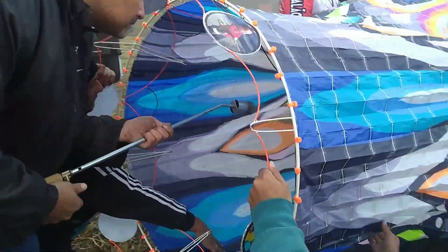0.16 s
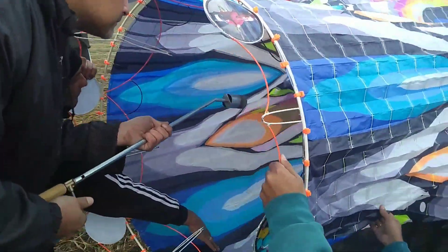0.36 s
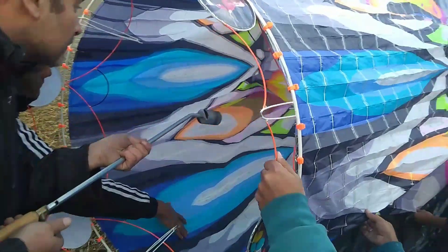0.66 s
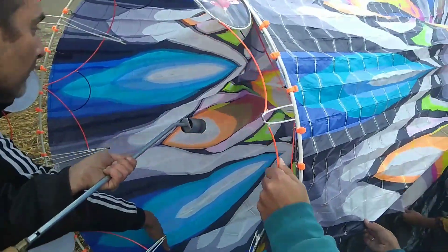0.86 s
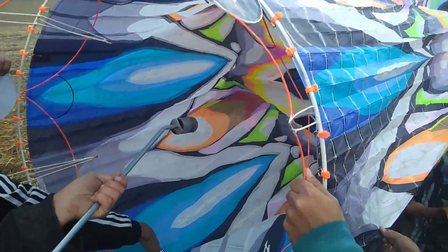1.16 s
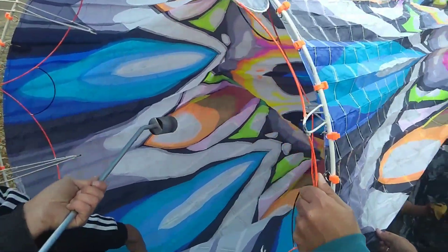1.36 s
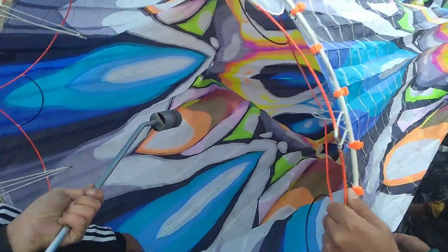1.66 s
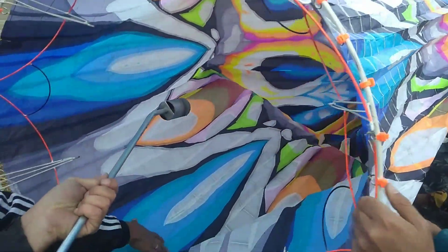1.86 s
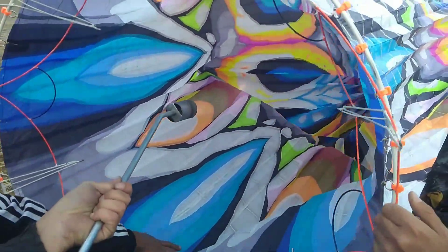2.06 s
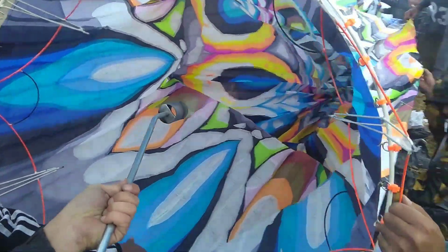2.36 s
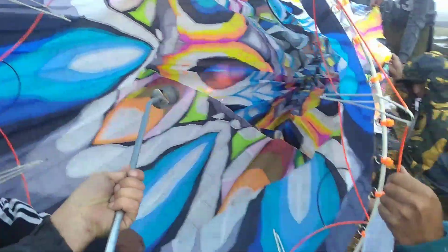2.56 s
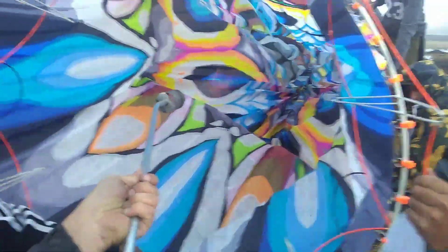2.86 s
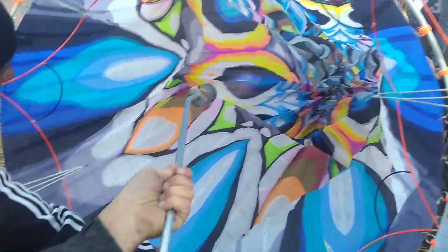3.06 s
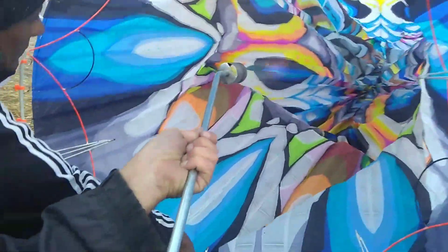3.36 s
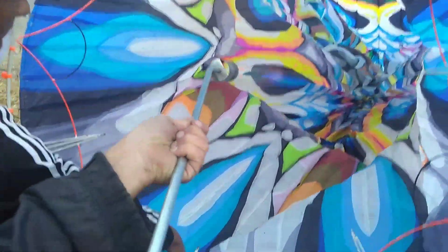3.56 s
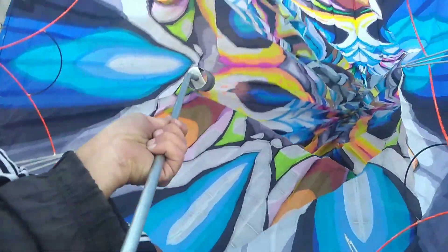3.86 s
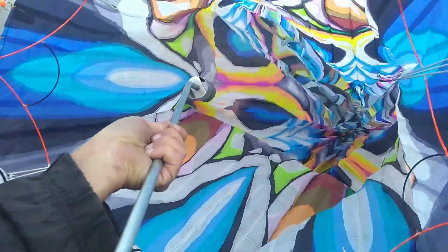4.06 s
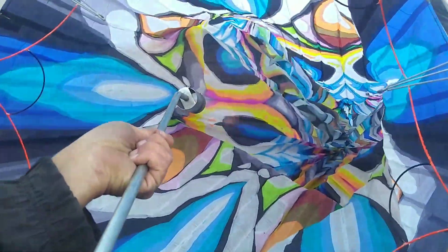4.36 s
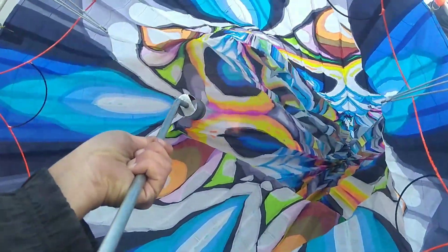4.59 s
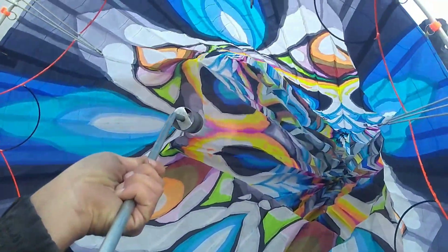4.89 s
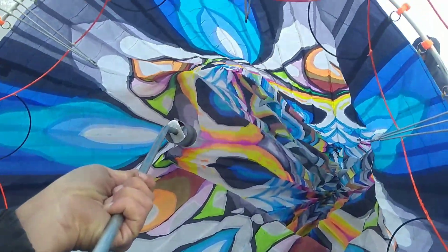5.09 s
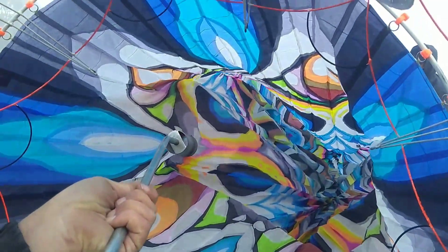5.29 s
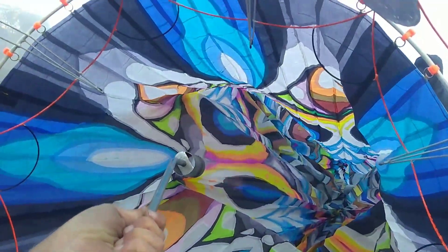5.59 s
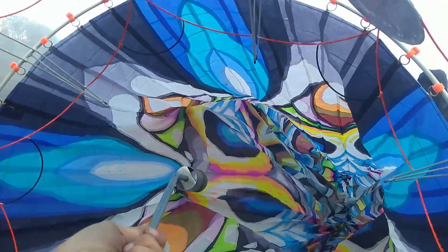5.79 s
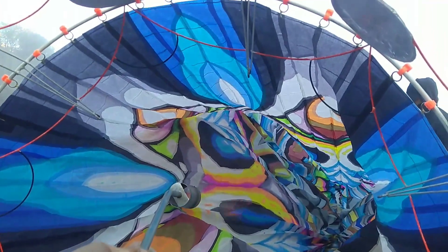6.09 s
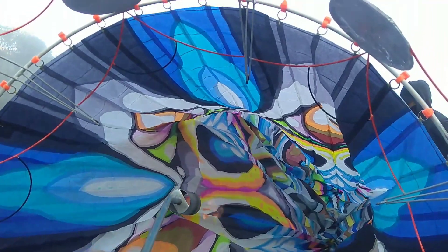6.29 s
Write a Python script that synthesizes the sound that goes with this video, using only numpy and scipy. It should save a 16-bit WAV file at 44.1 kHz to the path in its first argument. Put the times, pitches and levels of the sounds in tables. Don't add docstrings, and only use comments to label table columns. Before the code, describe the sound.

A hand-held gas torch burns steadily close by outdoors, a low fluttering flame roar under a constant hissing gas jet, fading quickly at the end.

```python
import sys
import numpy as np
from scipy import signal
from scipy.fft import rfft, irfft, next_fast_len
from scipy.io import wavfile
from scipy.ndimage import uniform_filter1d, map_coordinates

SR = 44100
rng = np.random.default_rng(int(sys.argv[2]) if len(sys.argv) > 2 else 0)


def gain_from_db(level_db):
    decades = np.asarray(level_db, float) / 20
    return 10 ** decades


def wrap_up_sound(samples):
    columns = np.atleast_2d(samples).T
    tamed = np.clip(columns, -1, 1)
    steps = np.round(tamed * 32767).astype(np.int16)
    wavfile.write(sys.argv[1], SR, steps)


N = 284004

# (time [s], aim down the balloon [0-1], bearing towards the left [dB])
TORCH = [
    (0, 0.56, 5.5),
    (.8, 0.15, 2),
    (1.2, 0.38, 1),
    (1.7, 0.14, 1.5),
    (2.8, 0.35, 0.5),
    (3.3, 0.56, 2),
    (3.9, 0.8, 2),
    (4.7, 0.92, 2),
    (5.5, 0.63, 1.5),
    (6.1, 0.9, 2.5),
]


def unit(x):
    return x / np.sqrt(np.mean(x ** 2) + 1e-20)


def along(points, hz):
    f, v = np.transpose(points)
    return np.interp(np.log(hz + 1), np.log(f + 1), v)


def curves(rows):
    s, *cols = np.transpose(rows)
    return [np.interp(np.arange(N) / SR, s, c) for c in cols]


def wobble(rate):
    knots = rng.standard_normal(int(N * rate / SR) + 4)
    return map_coordinates(knots, [np.arange(N) * rate / SR])


def filtered(x, response):
    m = next_fast_len(N + SR // 2)
    return irfft(rfft(x, m) * response(np.fft.rfftfreq(m, 1 / SR)), m)[..., :N]


def patches(hz, s, hz_wide, s_long):
    field = rng.standard_normal((len(hz), len(s)))
    field = uniform_filter1d(field, size=max(1, round(hz_wide / hz[1])), axis=0)
    return unit(uniform_filter1d(field, size=round(s_long / s[1]), axis=1))


def turbulence(patchy_db, drift_db, shape):
    hz, s, z = signal.stft(rng.standard_normal((2, N)), SR, nperseg=2048)
    quick = patchy_db * patches(hz, s, hz_wide=500, s_long=.07)
    slow = drift_db * patches(hz, s, hz_wide=200, s_long=.7)
    gain = gain_from_db(quick + slow) * shape(hz[:, None], s)
    return unit(signal.istft(z * gain, SR, nperseg=2048)[1][:, :N])


def aim(s):
    return np.clip(np.interp(s, *np.transpose(TORCH)[:2]), 0, 1)


def lean(db):
    return gain_from_db(np.array([db / 2, -db / 2]))


def echoed(hz, s):
    # (time [s], ground [ms], near wall [ms], hoop side [ms], far wall [ms])
    echo_paths = [(0.0, 3.521, 0.942, 2.412, 5.608), (0.52, 3.494, 1.162, 2.268, 5.48),
                  (1.05, 3.029, 1.011, 2.441, 5.702), (1.58, 3.554, 1.052, 3.08, 5.748),
                  (2.1, 3.664, 0.876, 3.172, 5.665), (2.62, 3.609, 0.841, 3.165, 5.754),
                  (3.15, 3.543, 0.929, 3.435, 5.744), (3.68, 3.384, 0.949, 3.388, 5.298),
                  (4.2, 3.384, 1.323, 3.406, 5.242), (4.73, 3.447, 1.358, 3.529, 5.306),
                  (5.25, 3.456, 1.498, 3.519, 5.473), (5.78, 3.487, 1.541, 3.557, 5.479),
                  (6.3, 3.485, 1.592, 3.575, 5.522)]
    echo_strengths = [
        0.25,
        0.092,
        -0.12,
        -0.08,
    ]
    # (from [s], to [s], centre [Hz], gain [dB])
    skin_folds = [(-3, 2.54, 338, -9.5), (0, 0.84, 1224, -11), (1.6, 4.7, 587, 3), (5.25, 5.47, 360, 1),
                  (1.5, 2.6, 270, -3), (1.9, 1.55, 250, -1.5), (4.5, 5.6, 546, -7.5), (4, 4.4, 1120, -7),
                  (4.5, 5.3, 1090, -8), (0.6, 1.25, 920, 3), (1.5, 2.2, 1060, 3.5), (.8, 1.3, 1800, 4.5),
                  (1.8, 2.15, 440, -2), (3.5, 4.76, 590, -6.5), (4.5, 5.05, 565, 6), (5.5, 6.6, 272, 3),
                  (2.1, 2.7, 1150, 2), (3, 5.1, 1840, -7)]
    echoes_grow, turn_s = 0.46, 0.11
    scattered_share = 0.2

    past = lambda t: 1 / (1 + np.exp((t - s) / turn_s))
    fold_db = 0
    for start, end, centre, db in skin_folds:
        wide_hz = 34 + 0.025 * centre
        fold_db = fold_db + db * (past(start) - past(end)) * np.exp(-((hz - centre) / wide_hz) ** 2)
    gain = gain_from_db(fold_db)
    when, *paths_ms = np.transpose(echo_paths)
    for share, ms in zip(echo_strengths, paths_ms):
        strength = share * (1 + echoes_grow * aim(s))
        delay_s = np.interp(s, when, ms) / 1000
        gain = gain * abs(1 + strength * np.exp(-2j * np.pi * hz * delay_s))
    return np.array([gain, gain ** scattered_share])


def at_ports(pair):
    # (frequency [Hz], left minus right [dB], likeness [0-1])
    port_pair = [(20, 1, 0), (80, -13, 0.86), (282, -11.5, 0.96), (540, -6.5, 0.89), (2200, -2, 0.95),
                 (3500, -1, 0.68), (5400, -5, 0.66), (6700, -4, 0.67), (8450, -2.5, 0.43),
                 (9900, -1.5, 0.03), (12300, 1.5, 0.6), (14500, -1, 0)]
    # (frequency [Hz], lag [half cycles])
    port_lag = [(20, -.2), (450, -.25), (1120, 0), (2300, 1), (3100, 1.9), (3800, 2.15), (4450, 2.85),
                (4850, 3.05), (5860, 3.95), (6250, 4.65), (7050, 5), (7500, 5.7), (8500, 6), (10500, 7.5),
                (14300, 4), (16000, 3)]
    # (centre [Hz], width [Hz], added lean [dB], likeness lost [0-1])
    housing_shades = [
        (1236, 500, 10, 0.74),
        (3000, 1700, 2.5, 0.35),
        (5920, 670, 7, 0.25),
        (10900, 800, 2, .1),
    ]
    f, lean_db, alike = np.transpose(port_pair)

    def mix(hz):
        shade_db, lost = sum(np.outer([db, loss], np.exp(-(2 * (hz - c) / w) ** 2))
                             for c, w, db, loss in housing_shades)
        turn = np.arccos(np.clip(np.interp(hz, f, alike) - lost, 0, 1)) / 2
        lag = np.exp(-.5j * np.pi * np.interp(hz, *np.transpose(port_lag)))
        half = gain_from_db((np.interp(hz, f, lean_db) + shade_db) / 2) * lag
        return np.array([[half, half], [1 / half, -1 / half]]) * [np.cos(turn), np.sin(turn)]
    return filtered(pair[None], mix).sum(axis=1)


def jet():
    # (time [s], level [dB])
    jet_level = [(0, -36), (.3, -35), (1, -35.5), (1.6, -35), (2.68, -36), (2.87, -37), (3.84, -33.5),
                 (4.65, -36), (4.92, -33), (5.2, -36), (5.48, -32.5), (5.7, -35.5), (6.15, -33),
                 (6.32, -31), (6.36, -35), (6.44, -30)]
    # (time [s], centre [Hz], level [dB])
    cup_whistle = [(0, 6240, -57), (.7, 6460, -37.5), (.95, 6700, -45), (1.25, 6200, -38), (1.6, 6700, -46),
                   (2.301, 6700, -53), (2.9, 6800, -42), (3.3, 7040, -50), (3.55, 6900, -35.5),
                   (3.85, 6700, -33), (4.2, 6700, -35.5), (4.55, 6700, -34.5), (4.95, 6560, -33),
                   (5.3, 6450, -35), (5.6, 6500, -38), (6.3, 6650, -39)]
    # (time [s], rim centre [Hz], rim level [dB], bowl level [dB])
    cup_rings = [(0, 7420, -50, -42), (.2, 7400, -43, -37.5), (.55, 7350, -46, -39),
                 (.75, 7040, -37.5, -46), (1.05, 7950, -41, -59), (1.45, 7550, -37, -58),
                 (1.8, 7300, -36.5, -48), (2.15, 7400, -39, -64), (2.45, 7200, -60, -44),
                 (2.7, 7200, -48.5, -37.5), (3.15, 7460, -61, -39), (3.35, 7600, -56, -43),
                 (3.7, 7950, -65, -41.5), (4.3, 7700, -42, -39.5), (4.8, 7450, -50, -46),
                 (5.1, 7500, -43, -51), (5.5, 7360, -40, -44), (6.2, 7500, -42, -39.5)]
    # (frequency [Hz], density [dB per Hz])
    wand_spectrum = [(1200, -33), (2000, -1.5), (2700, 1), (3600, -0.5), (4400, -3.5), (5400, -3.5),
                     (6100, -4.5), (7200, -4.5), (8000, -15), (10000, -41)]
    # (frequency [Hz], density [dB per Hz])
    spray_spectrum = [(3000, -38), (6000, -7), (8000, 1.5), (10000, -0.5), (12500, -2), (14000, -4),
                      (15000, -4), (16000, 1)]
    wand_db, cup_db, spray_db = -1, -7, -8
    across_db, aimed_db = -5, 2

    s_cup, whistle_hz, whistle_db = np.transpose(cup_whistle)
    s_ring, rim_hz, rim_db, bowl_db = np.transpose(cup_rings)
    pipe = lambda hz: 1 / abs(1 - .4 * np.exp(-2j * np.pi * hz / 239.6))
    band = lambda hz, centre, db, wide: gain_from_db(db) / (1 + (2 * (hz - centre) / wide) ** 4)

    def rings(hz, s):
        whistle = band(hz, np.interp(s, s_cup, whistle_hz), np.interp(s, s_cup, whistle_db), wide=840)
        rim = band(hz, np.interp(s, s_ring, rim_hz), np.interp(s, s_ring, rim_db), wide=560)
        bowl = band(hz, 5540, np.interp(s, s_ring, bowl_db), wide=710)
        return whistle + rim + bowl

    facing_db = lambda hz, s: 3.5 * np.exp(-((s - 2) / 0.77) ** 4 - ((hz - 3050) / 600) ** 2)
    wander = wobble(7)

    def beam(hz, s):
        edge_hz = 14950 + 450 * aim(s) + 80 * np.interp(s * SR, np.arange(N), wander)
        top_db = (across_db + (aimed_db - across_db) * aim(s)) * np.clip((hz - 12500) / 2000, 0, 1)
        return gain_from_db(top_db - np.clip((hz - edge_hz) / 6, 0, 60))

    flutter_db = curves(jet_level)[0] + 0.084 * wobble(4.28) + 0.9 * wobble(14)
    wand = turbulence(patchy_db=1.2, drift_db=1.3,
                      shape=lambda hz, s: gain_from_db(along(wand_spectrum, hz) + facing_db(hz, s)) * pipe(hz))
    cup = turbulence(patchy_db=1.3, drift_db=.6, shape=lambda hz, s: rings(hz, s) * pipe(hz) ** .9)
    spray = turbulence(patchy_db=1.3, drift_db=1.5,
                       shape=lambda hz, s: gain_from_db(along(spray_spectrum, hz)) * beam(hz, s) * pipe(hz) ** .45)
    hiss = gain_from_db(wand_db) * wand + gain_from_db(cup_db) * cup + gain_from_db(spray_db) * spray
    return gain_from_db(flutter_db) * lean(np.full(N, -2)) * at_ports(hiss)


def flame():
    # (time [s], level [dB])
    flame_level = [(0.0, -20.5), (0.29, -23.5), (0.58, -21.5), (0.9, -23), (1.2, -21.5), (1.68, -22.5),
                   (2.11, -21), (2.34, -22.5), (2.45, -22), (2.62, -23), (2.85, -25), (3.05, -22),
                   (3.3, -24), (3.5, -21.5), (3.62, -22.5), (3.84, -21), (4.06, -20.5), (4.17, -21.5),
                   (4.45, -21.5), (4.69, -22.5), (5.03, -21.5), (5.5, -21.5), (5.71, -25), (5.98, -20.5),
                   (6.2, -21)]
    # (frequency [Hz], density [dB per Hz])
    roar_spectrum = [(20, -58), (45, -59), (75, -23.5), (120, -12.5), (170, -9), (230, -1.5), (310, -1),
                     (420, 2.5), (600, -3.5), (720, -13.5), (1000, -37), (1600, -46)]
    # (frequency [Hz], density [dB per Hz])
    rush_spectrum = [(300, -63), (600, 1), (820, 1.5), (1100, -0.5), (1420, -3), (1650, -7.5), (1900, -4),
                     (2200, -13), (3000, -29)]
    across_db, follows, aimed_db = -26.5, 0.57, -6.5

    roar_db, = curves(flame_level)
    aimed, lean_db = curves(TORCH)
    rush_db = across_db + follows * (roar_db - roar_db.mean()) + aimed_db * aimed
    darker_db = lambda hz, s: -1.5 * aim(s) * np.log2((hz + 60) / 347)
    flicker_db = 0.032 * wobble(3.3) + 0.67 * wobble(25) + .5 * wobble(60)
    roar = turbulence(patchy_db=0.9, drift_db=0.53,
                      shape=lambda hz, s: gain_from_db(along(roar_spectrum, hz) + darker_db(hz, s)) * echoed(hz, s))
    rush = turbulence(patchy_db=1.0, drift_db=1,
                      shape=lambda hz, s: gain_from_db(along(rush_spectrum, hz)) * echoed(hz, s))
    fire = gain_from_db(roar_db - 2.4 + flicker_db) * roar + gain_from_db(rush_db + 0.63 * flicker_db) * rush
    return lean(lean_db) * at_ports(fire)


def hand_held(x, lag_rad, lean_db):
    hz, s, z = signal.stft(x, SR, nperseg=512)
    depth = np.clip(hz / 7000, 0, 1.8)[:, None]
    lag = lag_rad * patches(hz, s, hz_wide=1200, s_long=.4)
    tilt_db = lean_db * patches(hz, s, hz_wide=600, s_long=.7)
    half = np.exp(.5j * depth * lag) * gain_from_db(depth * tilt_db / 2)
    return signal.istft(z * [half, 1 / half], SR, nperseg=512)[1][:, :N]


def scene():
    return hand_held(flame() + jet(), lag_rad=.55, lean_db=2)


def nulls(table):
    return lambda hz: gain_from_db(sum(db * np.exp(-(2 * (hz - c) / w) ** 2) for c, w, db in table))


def turned_nulls(pair):
    # (time [s], first [Hz], share of its depth, second [Hz], second's depth [dB])
    camera_turning = [(0, 2330, .8, 4500, -4), (.5, 2335, 1.15, 4600, -5), (.8, 2270, .85, 4550, -3),
                      (1.15, 2245, .6, 4500, 0), (1.4, 2335, 1.05, 4560, -1), (2.05, 2385, 1.05, 4500, -5),
                      (2.22, 2320, .65, 4580, -7), (2.5, 2310, 1.2, 4750, -6), (2.85, 2320, 1.25, 4980, -6),
                      (3.02, 2300, 1.25, 4950, 0), (3.15, 2260, .65, 4860, 0), (3.45, 2220, .9, 4750, -1),
                      (3.7, 2350, .95, 4740, -5), (4.08, 2320, 1.4, 4500, -3), (4.32, 2290, .55, 4550, 0),
                      (4.45, 2345, 1.1, 4600, 0), (4.75, 2280, .85, 4500, 0), (5.15, 2330, 1.15, 4600, -2),
                      (5.4, 2210, .55, 4500, -4), (5.7, 2265, .8, 4650, -6), (6.05, 2255, .85, 4580, -8),
                      (6.25, 2230, .9, 4820, -10), (6.33, 2300, .2, 4850, -6), (6.44, 2280, .15, 4850, -5)]
    # (centre [Hz], width [Hz], depth [dB])
    highest_nulls = [
        (13400, 700, -4),
        (14250, 480, -8),
    ]
    # (time [s], length [s], centre [Hz], depth [dB])
    passing_nulls = [
        [(4.57, 0.44, 7100, -10), (0.88, .14, 11300, -12), (1.5, .25, 11200, -4), (1.2, 0.13, 8300, -6), (5.2, .5, 10200, -5), (1.2, .06, 6500, -9), (2.33, 0.17, 7100, -14), (3.4, 0.14, 10700, -3), (6.8, .2, 7150, 2), (6.38, 0.073, 11000, -15)],
        [(4.5, .3, 8300, -13), (3.3, .35, 12100, -5), (3.9, .15, 10000, -3), (5.5, .5, 11150, -7), (3.6, 1.1, 6100, -10), (.2, .5, 14700, -2), (2.2, .65, 3350, -10), (3.7, .4, 3520, -9), (5.15, .7, 3300, -11), (6.15, .25, 3400, -11), (.12, .15, 3550, -8), (.15, .25, 15200, -12), (1.65, .1, 12100, -6), (1.2, .12, 3400, -11)],
    ]
    # (time [s], length [s], centre [Hz], depth [dB])
    hand_jolts = [(1.91, .04, 4450, -14), (2.16, .05, 4560, -13), (2.63, .03, 4860, -12),
                  (2.8, .04, 4950, -9), (3.65, .04, 4770, -8), (5.275, .025, 4450, -20),
                  (5.415, .025, 4430, -20), (5.65, .045, 4780, -13), (5.86, .085, 4500, -14),
                  (6.06, .025, 4750, -20), (6.1, .05, 4470, -14), (6.27, .045, 4850, -14)]
    # (time [s], length [s], centre [Hz], depth
    # [dB])
    top_dips = [(.65, .65, 15300, -11), (2.78, .15, 15350, -10), (3.4, .26, 15250, -12),
                (4.4, .08, 15150, -12), (5.7, .7, 15550, -10), (3.95, .25, 15550, -10),
                (.45, .3, 13250, -6), (1.65, .4, 13350, -6), (2.9, .27, 13350, -6),
                (3.85, .13, 13000, -7), (4.15, .08, 13000, -8), (5.35, .55, 13400, -3.5),
                (6.15, .1, 13300, -5)]

    hz, s, z = signal.stft(pair, SR, nperseg=1024)
    when, *cols = np.transpose(camera_turning)
    first_hz, share, second_hz, second_db = (np.interp(s, when, c) for c in cols)
    dip = lambda c, w: np.exp(-(2 * (hz[:, None] - c) / w) ** 2)
    tremor = lambda: np.interp(s * SR, np.arange(N), wobble(9))

    def shaky(c, w, db):
        return db * (1 + .2 * tremor()) * dip(c * (1 + .015 * tremor()), w)

    def brief(rows):
        return sum(db * np.exp(-((s - at) / long) ** 4) * dip(c, 0.065 * c) for at, long, c, db in rows)

    first = shaky(first_hz, 380, share * -18)
    second = shaky(second_hz, 350, second_db)
    sum_db = first + second + shaky(*highest_nulls[0]) + brief([*passing_nulls[0], *hand_jolts, *top_dips])
    diff_db = shaky(*highest_nulls[1]) + brief(passing_nulls[1])
    return signal.istft(z * gain_from_db([sum_db, diff_db]), SR, nperseg=1024)[1][:, :N]


def top_cut(x):
    return signal.sosfilt(signal.butter(12, 15450, fs=SR, output="sos"), x)


def record(dry):
    # (centre [Hz], width [Hz], depth [dB])
    diff_nulls = [
        (1118, 360, -25),
        (3650, 340, -13),
        (5800, 350, -3),
    ]
    # (time [s], level [dB])
    closing_fade = [
        (6.12, 4),
        (6.22, 0),
        (6.32, -2.5),
        (6.345, -8.5),
        (6.44, -14.5),
    ]
    ceiling = .8

    mid, side = turned_nulls(np.array([dry[0] + dry[1], dry[0] - dry[1]]))
    mid = filtered(mid, nulls([(11200, 410, -3.5)])) / 2
    side = filtered(side, nulls(diff_nulls)) / 2
    wet = np.array([mid + side, mid - side]) * gain_from_db(curves(closing_fade)[0])
    wet = wet / (1 + abs(wet / ceiling) ** 6) ** (1 / 6)
    return top_cut(wet)


dry = scene()
out = record(dry)
wrap_up_sound(out)
```